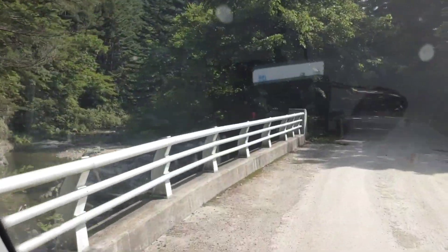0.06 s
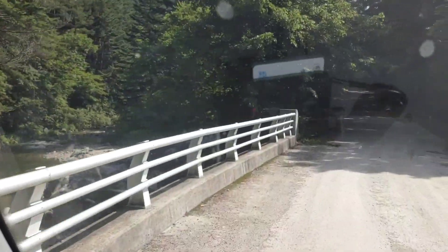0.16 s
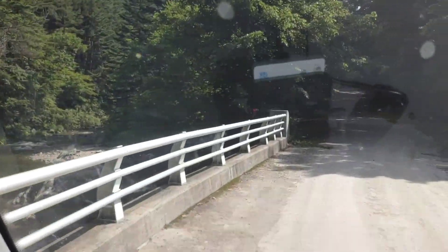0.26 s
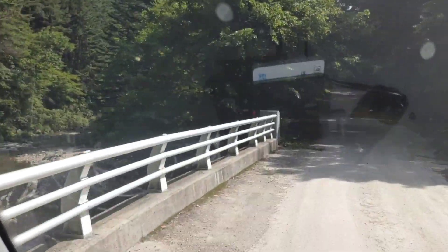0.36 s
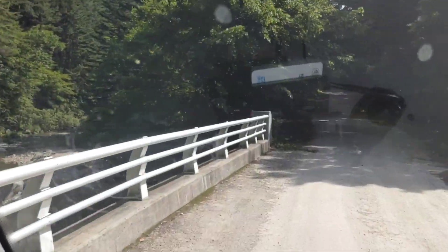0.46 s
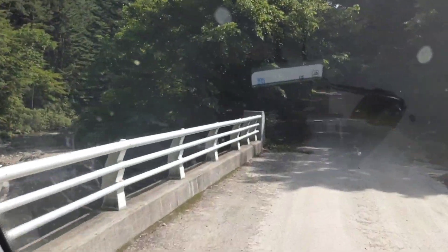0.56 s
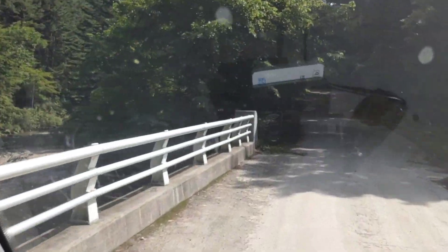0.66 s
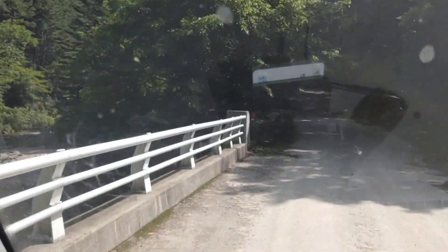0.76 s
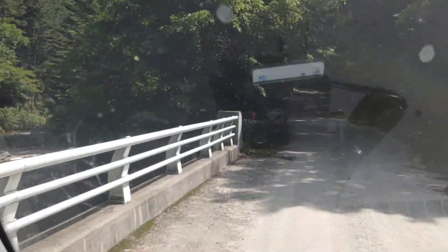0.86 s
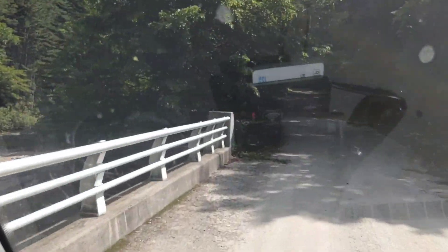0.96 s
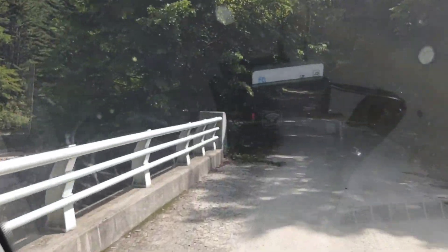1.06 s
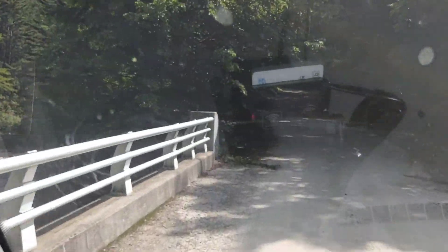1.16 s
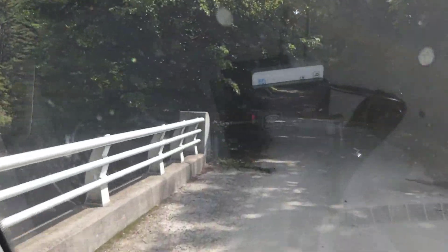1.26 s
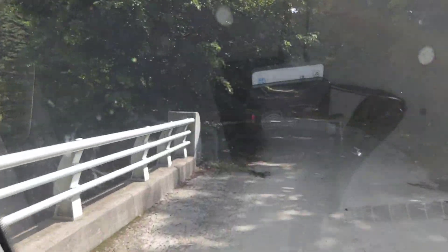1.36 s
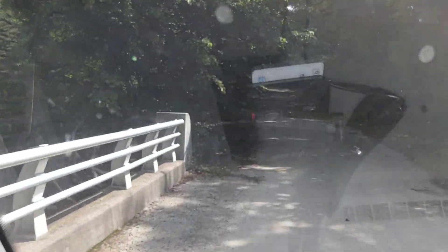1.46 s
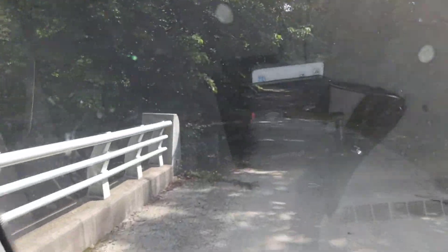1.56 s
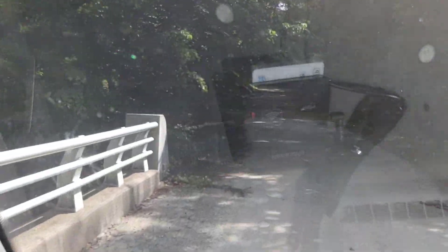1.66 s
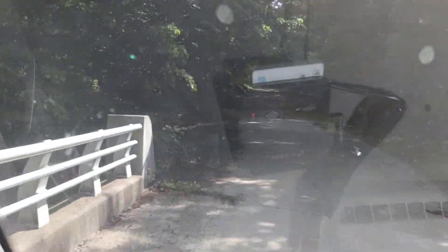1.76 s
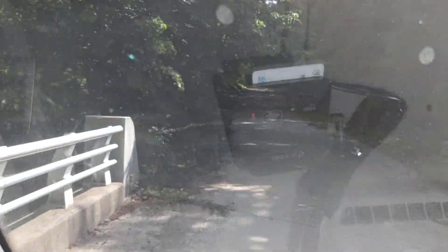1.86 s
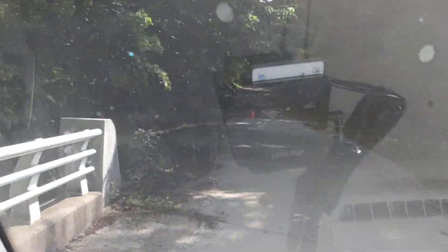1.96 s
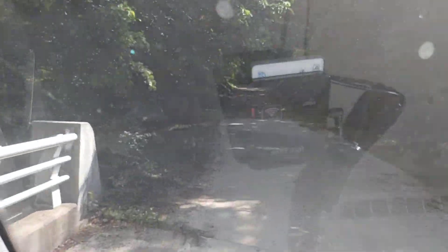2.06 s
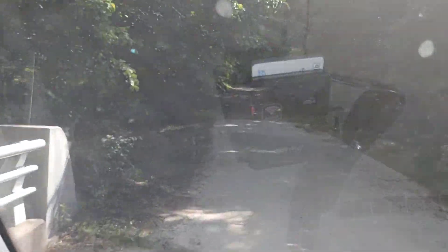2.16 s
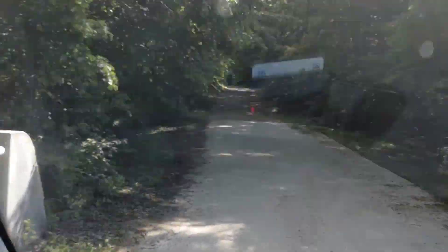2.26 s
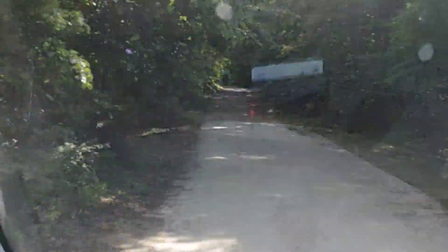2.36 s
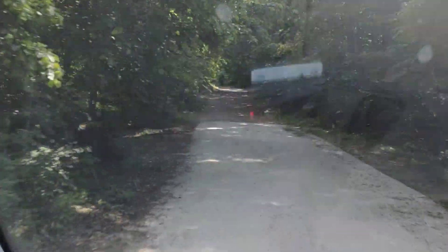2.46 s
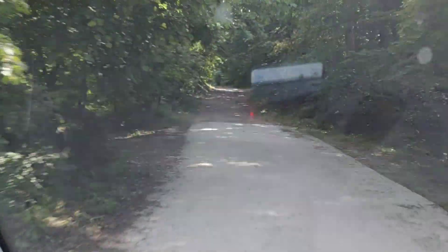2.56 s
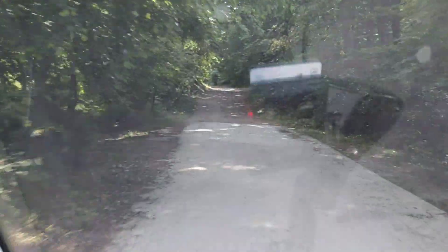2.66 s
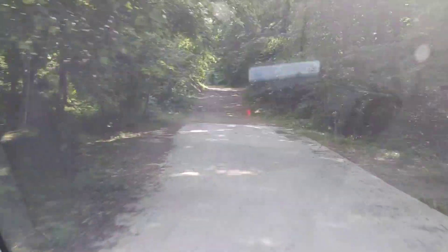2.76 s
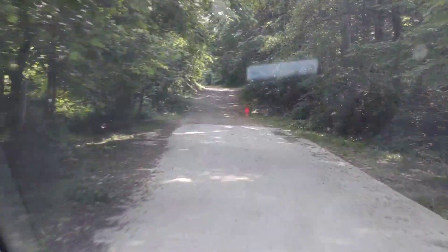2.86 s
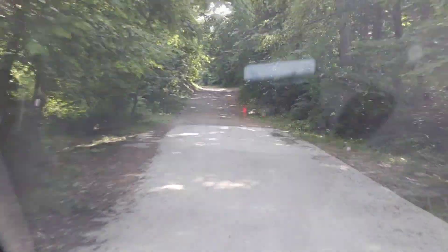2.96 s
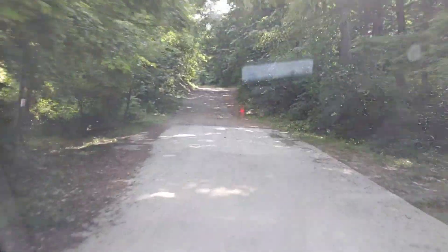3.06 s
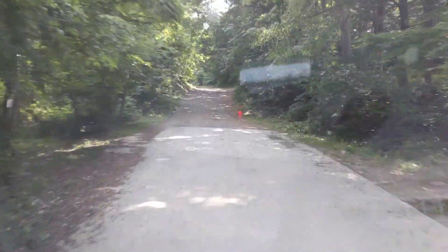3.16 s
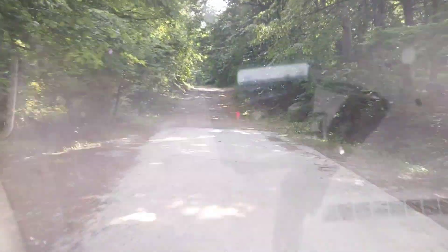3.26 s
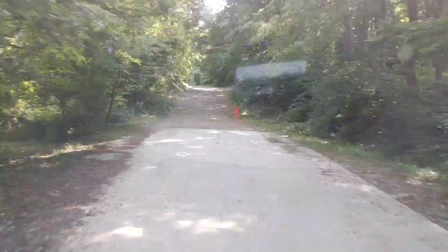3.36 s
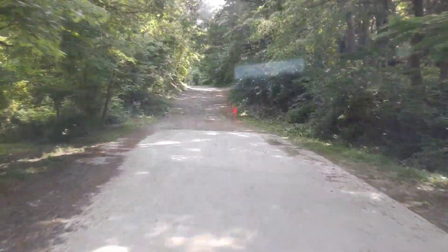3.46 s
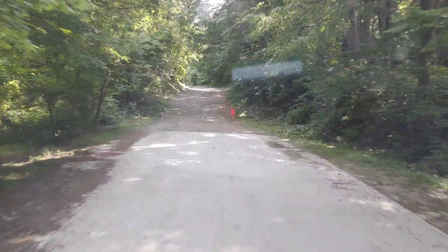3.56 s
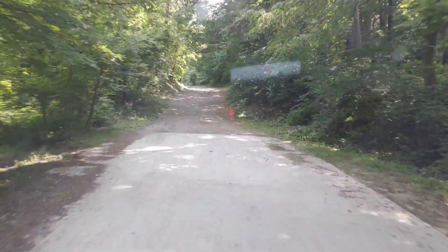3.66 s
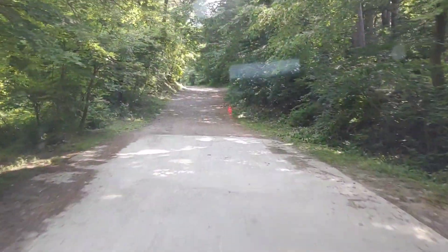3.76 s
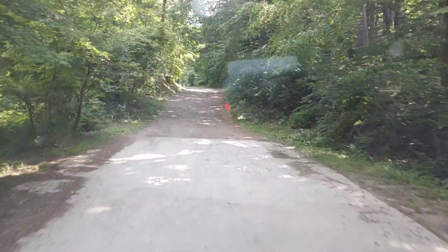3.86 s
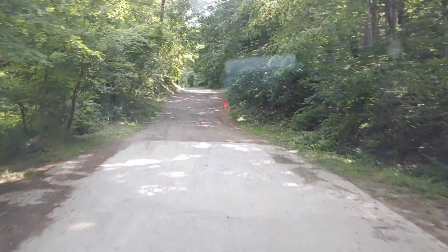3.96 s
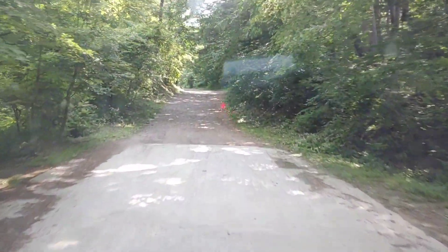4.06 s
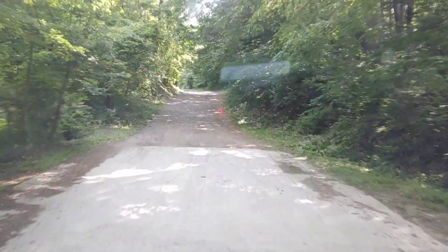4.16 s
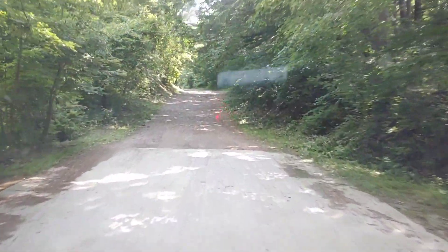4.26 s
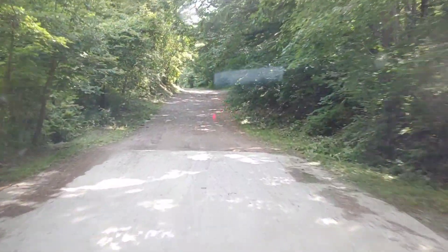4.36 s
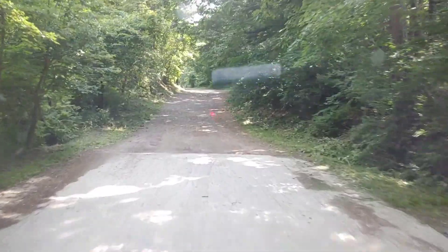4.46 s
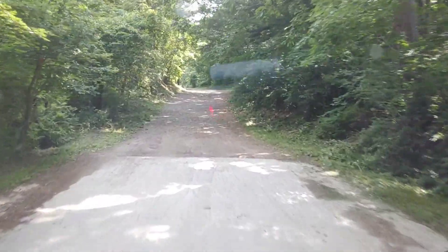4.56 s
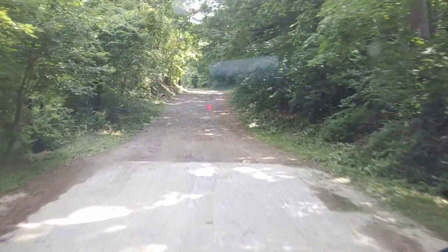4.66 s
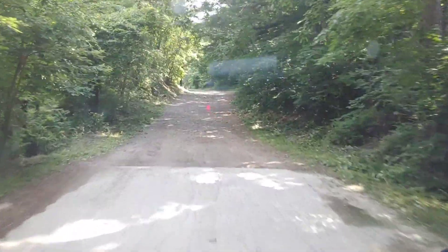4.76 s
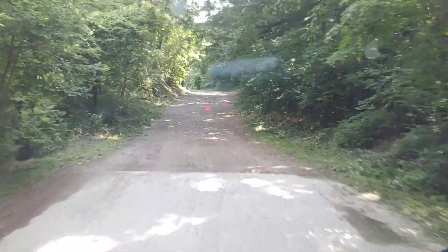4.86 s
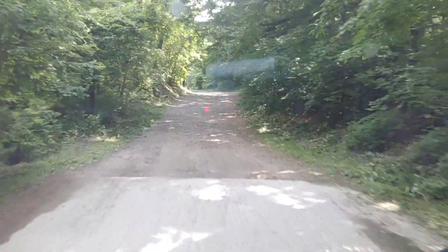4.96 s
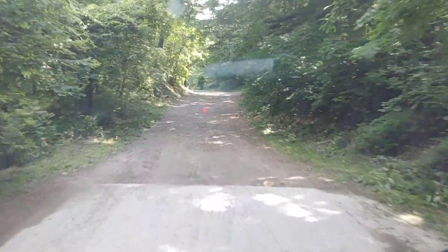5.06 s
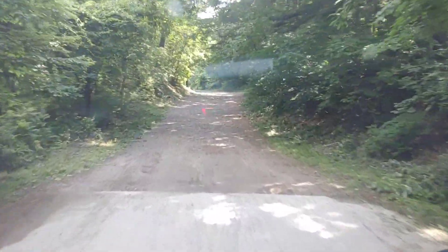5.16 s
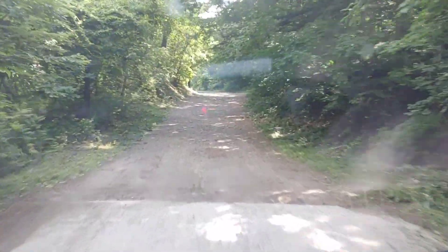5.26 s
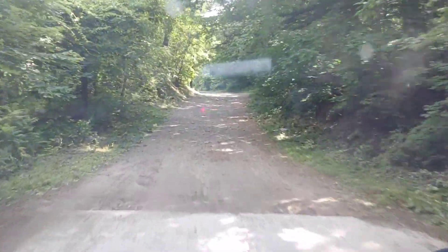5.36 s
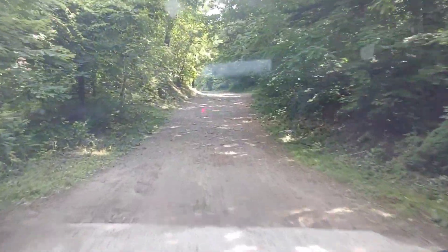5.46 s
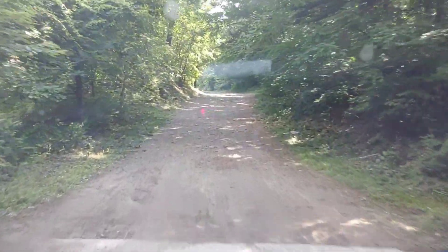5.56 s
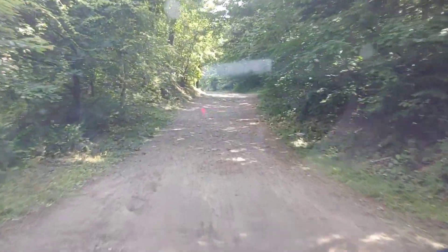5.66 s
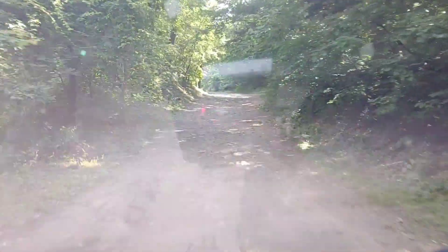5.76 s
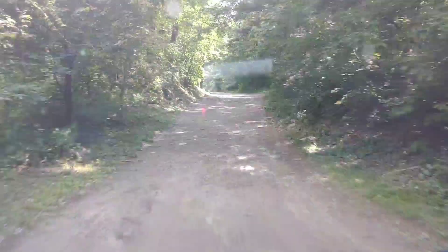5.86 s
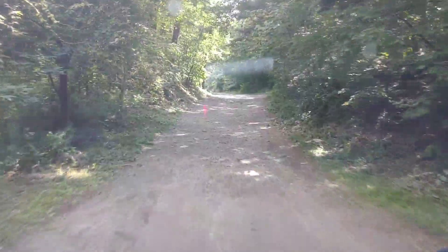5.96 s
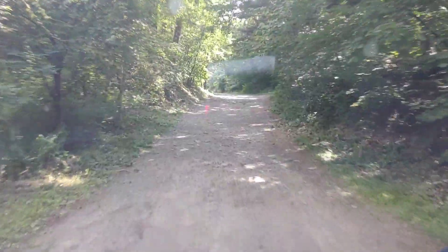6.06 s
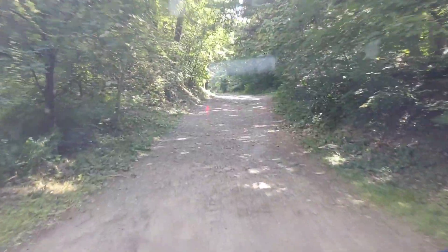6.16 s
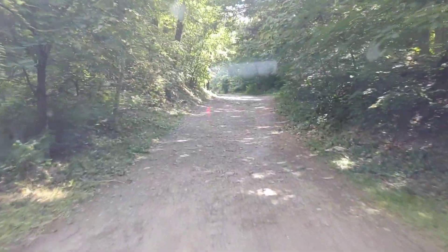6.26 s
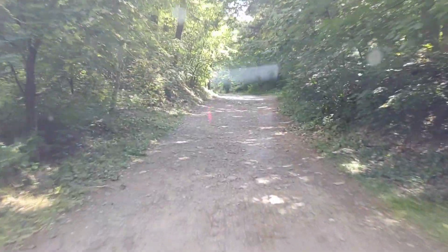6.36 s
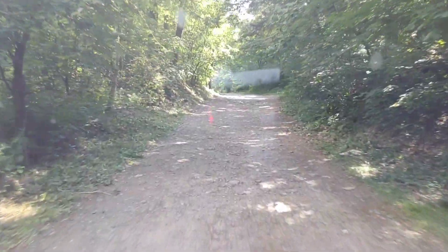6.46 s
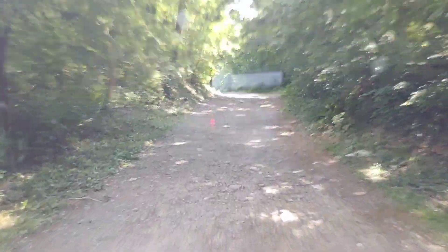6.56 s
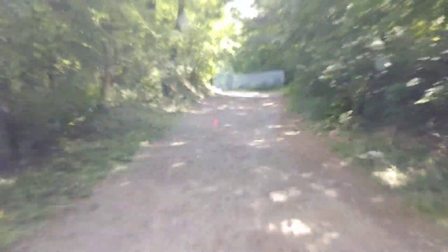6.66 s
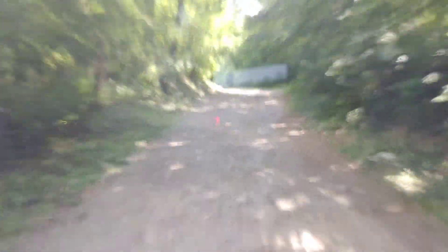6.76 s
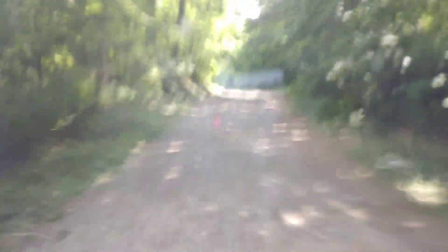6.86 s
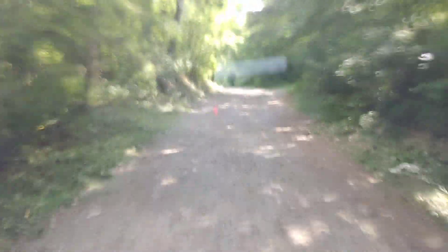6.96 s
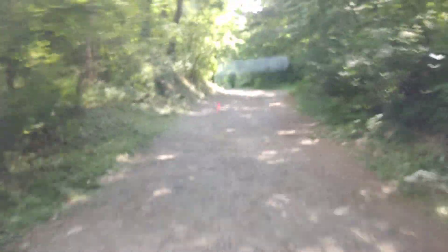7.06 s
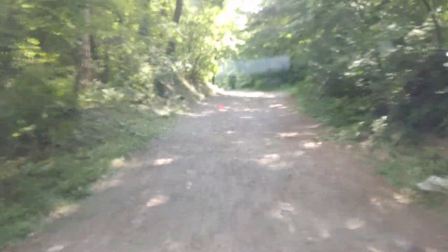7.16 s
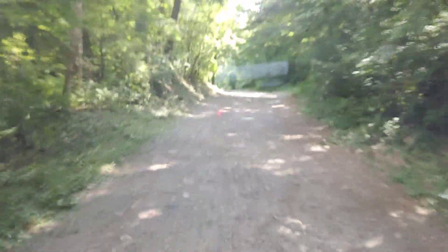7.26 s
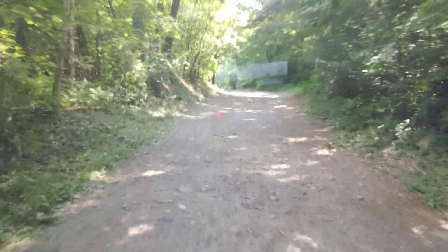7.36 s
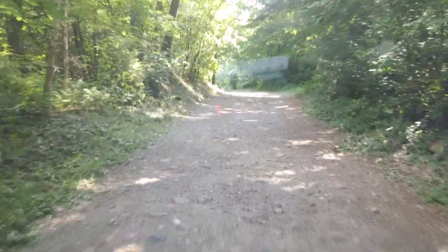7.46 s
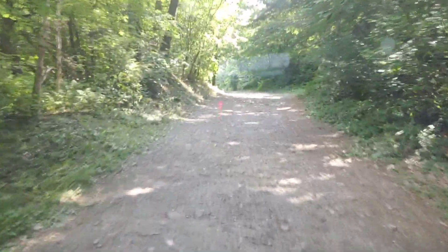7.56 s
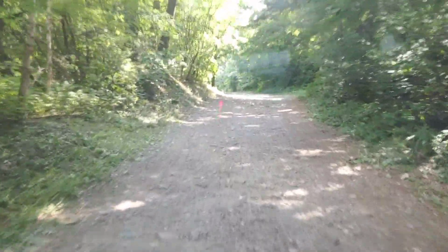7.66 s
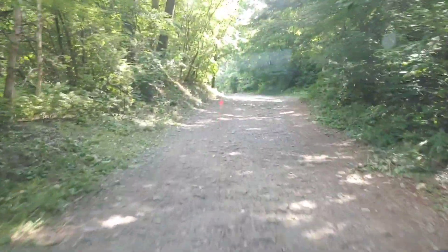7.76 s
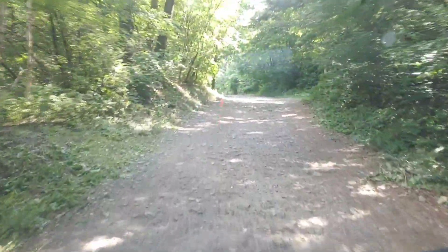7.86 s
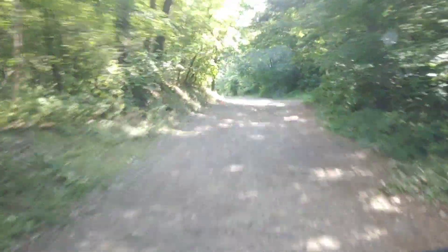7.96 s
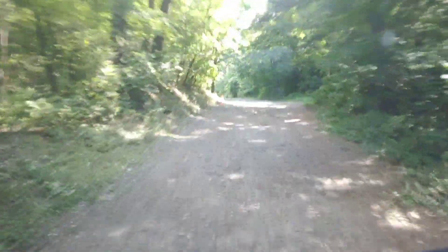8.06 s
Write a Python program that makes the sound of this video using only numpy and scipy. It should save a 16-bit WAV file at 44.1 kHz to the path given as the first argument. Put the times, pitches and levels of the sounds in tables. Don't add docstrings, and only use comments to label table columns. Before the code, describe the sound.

Car cabin rolling off a bridge: steady drone, airy road hiss and dull bumps, until stones hammer the underbody and a loose hollow part knocks.

```python
import sys
import numpy as np
from scipy import signal
from scipy.fft import rfft, irfft
from scipy.io import wavfile
from scipy.ndimage import uniform_filter1d

SR = 44100
rng = np.random.default_rng(int(sys.argv[2]) if len(sys.argv) > 2 else 0)


def transcribe(signal):
    frames = np.atleast_2d(signal).T
    limited = np.clip(frames, -1, 1)
    pcm = np.round(limited * 32767).astype(np.int16)
    wavfile.write(sys.argv[1], SR, pcm)


def to_linear_factor(level_db):
    exponent = np.asarray(level_db, float) / 20
    return 10 ** exponent


N = 358091
TIME = np.arange(N) / SR
PORT_LAG_SAMPLES = 18


def level(x, db):
    return x * to_linear_factor(db) / np.sqrt(np.mean(x ** 2))


def columns(*tables):
    s, *rest = np.transpose(np.vstack(tables))
    return [np.interp(TIME, s, c) for c in rest]


def walk(rate_hz):
    hold = int(SR / rate_hz)
    steps = np.repeat(rng.standard_normal(N // hold + 1), hold)
    return 1.23 * uniform_filter1d(uniform_filter1d(steps, hold), hold)[:N]


def grit(rate_hz, spread_db, smooth):
    where, size = rng.random(N), rng.exponential(size=N)
    sign, bed = rng.standard_normal(N), rng.standard_normal(N)
    blows = (where < rate_hz / SR) * to_linear_factor(spread_db * np.minimum(size, 2.5)) * np.sign(sign)
    return level(blows, 0) + smooth * bed


def ring(x, modes):
    out = 0
    for k, (hz, width_hz, db) in enumerate(modes):
        b, a = signal.iirpeak(hz, hz / (1.54 * width_hz), fs=SR)
        once = signal.lfilter(b, a, x, axis=-1)
        twice = signal.lfilter(b, a, once, axis=-1)
        out = out + (-1) ** k * to_linear_factor(db) * twice / np.sqrt(width_hz)
    return out


def ports(shared, own, alike_hz, treble_alike):
    hz = np.fft.rfftfreq(N, 1 / SR)
    bass = 1 / (1 + (hz / alike_hz) ** 4)
    late = np.exp(-2j * np.pi * hz * PORT_LAG_SAMPLES / SR * (1 - bass))
    alike = np.clip(0.99 * bass + treble_alike * (1 - bass), 0, 1)
    common = np.sqrt(alike) * rfft(shared)
    both = np.array([common, common * late]) + np.sqrt(1 - alike) * rfft(own, axis=-1)
    return irfft(both, N, axis=-1)


def road_noise(rate_hz, spread_db, smooth):
    shared, left, right = (grit(rate_hz, spread_db, smooth) for _ in range(3))
    return ports(shared, np.array([left, right]), alike_hz=417, treble_alike=0.2)


def colour(x, points, split_hz):
    hz = np.maximum(np.fft.rfftfreq(N, 1 / SR), 1)
    f, db = np.transpose(points)
    shaped = rfft(x, axis=-1) * to_linear_factor(np.interp(np.log(hz), np.log(f), db))
    upper = 1 / (1 + (split_hz / hz) ** 3)
    rms = np.sqrt(np.mean(irfft(shaped, N, axis=-1) ** 2))
    return irfft(shaped * (1 - upper), N, axis=-1) / rms, irfft(shaped * upper, N, axis=-1) / rms


def swell(t, db, t60_s, rise_s):
    return to_linear_factor(db - 60 * t / max(t60_s, .01)) * (1 - np.exp(-t / rise_s)) ** 2


def bursts(times_s, dbs, t60s_s, rise_s):
    out, t = np.zeros(N + SR), np.arange(SR // 3) / SR
    for s, db, t60_s in zip(times_s, dbs, t60s_s):
        i = int(s * SR)
        out[i:i + len(t)] += swell(t, db, t60_s, rise_s)
    return out[:N]


# time_s, firing_hz, load_db
ENGINE = [(0, 47.25, 3.5), (.8, 50.6, -6.5), (1.3, 52.46, 2.5), (2, 53.73, 1), (2.6, 54.6, -2.5),
          (3.1, 58.15, -2), (3.6, 59.06, 4), (4.1, 60.28, 5.5), (4.8, 58.5, -3), (5.4, 57.04, -2.5),
          (5.85, 55.7, 0), (6.6, 55.35, -2), (8.12, 55.9, -1)]
# centre_hz, width_hz, peak_db
CABIN = [(58.2, 5.8, -33), (110.2, 16, -27.5), (168.4, 13.5, -26), (210, 43, -29.5)]
# start_s, end_s, firing_multiple, level_db
WHINES = [
    (1.15, 2.15, 17.9, -51.5),
    (2.3, 3.03, 16, -47),
    (3.35, 4.3, 35, -54),
    (5.7, 6.45, 16, -46.5),
    (5.6, 6.4, 36, -56),
    (5.9, 6.45, 18, -48.5),
    (1.1, 2.4, 9.9, -46),
]


def engine():
    hz, load_db = columns(ENGINE)
    turn = 2 * np.pi * np.cumsum(hz * (1 + 0.00387 * walk(6))) / SR
    hum = 0
    for k, (centre_hz, width_hz, peak_db) in enumerate(CABIN):
        detune = 2 * ((k + 1) * hz - centre_hz) / width_hz
        db = load_db + peak_db - 10 * np.log10(1 + detune ** 4)
        hum = hum + to_linear_factor(db + 1.5 * walk(9)) * np.sin((k + 1) * turn + k)
    for start_s, end_s, multiple, db in WHINES:
        fade = np.clip(np.minimum(TIME - start_s, end_s - TIME) / 0.15, 0, 1)
        hum = hum + fade * to_linear_factor(db + 2.5 * walk(12)) * np.sin(multiple * turn + .9 * walk(15))
    return np.sqrt(2) * hum


# time_s, roughness_db
ROAD = [(0, -20.5), (.35, -21.5), (.86, -19), (1.4, -24.5), (2.55, -22), (2.97, -20.5), (3.19, -12),
        (3.37, -19.5), (3.81, -21), (5.29, -20.5), (5.98, -22), (6.33, -20.5), (6.56, -21), (6.664, -6),
        (6.88, -6.5), (7.302, -10.5), (7.696, -16), (8.12, -12.5)]
# time_s, above_usual_sway_db
HEAVES = [(.35, 10), (.62, 3.5), (1.4, 7), (1.73, 2), (2.55, 2), (2.97, 6), (3.45, 6), (3.94, 8.5),
          (4.74, 6.5), (5.29, 8), (5.56, 10.5), (6.15, -2), (6.55, 5), (6.671, 0), (7.37, 6), (8.1, 6.5)]
# centre_hz, width_hz, level_db
SWAY = [(14, 12, -18), (34, 17, -0.5), (53.6, 9.1, 2), (68, 12, 4)]
# centre_hz, width_hz, level_db
BOOM = [(103.4, 18.6, -0.5), (145, 21.3, -3.5), (175, 30, 0), (242.8, 24.7, -8.5)]
# centre_hz, width_hz, level_db
PAN = [(299.7, 63, 0), (357.6, 36.5, -6.5), (444.3, 40.5, -4), (566, 81, -6.5), (648, 90, -7)]
SMOOTH_DB, PAN_SMOOTH_DB, PAN_PER_DB, SWAY_SMOOTH_DB, SWAY_PER_DB = -20.5, -32, 1.2046, -30, 0.82
HEAVE_S = 0.1


def road():
    boom_db, = columns(ROAD)
    rougher_db = boom_db - SMOOTH_DB
    pan_db = PAN_SMOOTH_DB + PAN_PER_DB * rougher_db
    heave_db = sum(db * np.exp(-((TIME - s) / HEAVE_S) ** 2) for s, db in HEAVES)
    sway_db = SWAY_SMOOTH_DB + SWAY_PER_DB * rougher_db + heave_db
    blows = road_noise(rate_hz=220, spread_db=3.0, smooth=0.76)
    finer = road_noise(rate_hz=500, spread_db=7.0, smooth=0.88)
    slow = road_noise(rate_hz=42, spread_db=-4.0, smooth=5.2)
    sway = level(ring(slow, SWAY), -2.1) * to_linear_factor(sway_db)
    boom = level(ring(blows, BOOM), -1.64) * to_linear_factor(boom_db)
    pan = level(ring(blows + finer, PAN), -2.0) * to_linear_factor(pan_db)
    return sway + boom + pan


# time_s, level_db
AIR = [(0, -37.5), (.27, -39), (.45, -36.5), (.9, -37), (1.2, -38.5), (1.5, -39.5), (2.2, -38), (2.7, -37),
       (3.0, -39), (3.17, -35.5), (3.35, -40.5), (5.5, -41), (8.12, -39)]
# time_s, level_db
WIND = [(0, -39.5), (.25, -39.5), (.45, -36), (.75, -38.5), (1.6, -39.5), (3.2, -39.5), (3.7, -38.5),
        (4.3, -40), (6, -42), (8.12, -43)]
# freq_hz, density_db_per_hz
AIR_COLOUR = [(500, 1.5), (750, 1), (960, 3.5), (1230, 0.5), (1330, 2), (1900, -1), (2410, -7.5),
              (3370, -6), (3660, -8.5), (4860, -9.5), (6300, -15), (9500, -16), (12100, -23), (15300, -33)]
# centre_hz, width_hz, level_db
TREAD = [(1334, 44, -3), (1680, 78, -1.5), (1878, 116, 1.5), (2150, 280, -3), (2620, 320, -6.5)]
WIND_SHARE = 0.44
TREAD_DB, TREAD_S, TREAD_SPREAD_S, TREAD_DUSTY_DB = 10, 0.61, 0.9, -7


def air():
    db, = columns(AIR)
    wind_db, = columns(WIND)
    treble_db = wind_db + WIND_SHARE * (db + 41.5) - db
    tread_db = TREAD_DUSTY_DB + TREAD_DB * np.exp(-((TIME - TREAD_S) / TREAD_SPREAD_S) ** 2)
    low, high = colour(road_noise(rate_hz=5500, spread_db=6.0, smooth=4.8), AIR_COLOUR, split_hz=3300)
    tread = level(ring(road_noise(rate_hz=2700, spread_db=5.0, smooth=2.9), TREAD), -7.5)
    tread = tread * to_linear_factor(tread_db + 3.0 * walk(14))
    low = low * to_linear_factor(1.0 * walk(6.7))
    high = high * to_linear_factor(treble_db + 1.02 * walk(11))
    return to_linear_factor(db + 5.0 + 0.19 * walk(1.27)) * (low + high + tread)


# time_s, peak_db, boom_hz, hardness_db
SEAMS = [(0.068, -10, 186, -8.5), (0.192, -5, 180, -14), (0.303, -7, 145, -11), (0.38, 0.5, 145, -15.5),
         (0.645, 0, 154, -14), (0.699, -11, 250, -7), (0.795, -4, 138, -12.5), (0.849, -7.5, 158, -20),
         (0.916, -3, 155, -14.5), (0.931, 0, 182, -22), (1.113, -4, 133.6, -24), (1.137, -22, 115, -12),
         (1.862, -18, 145, -6.5), (2.303, -11.5, 153, -10), (2.534, -7, 151, -15), (2.62, -15, 163, -7),
         (2.7, -3.5, 167, -13), (2.965, -3, 157, -16),
         (3.086, -1.5, 134, -7.5), (3.124, -7, 170, -3), (3.16, -12, 117, -5), (3.212, -13, 131, -23),
         (3.262, -22, 149, 2), (3.324, -7.5, 181.7, -9), (3.364, -15.5, 125, -7), (3.572, -3, 119, -17.5),
         (3.771, -3.5, 140, -12.5), (3.839, -9, 146, -10), (3.93, -9.5, 134, -7), (4.097, -5, 162, -21),
         (4.199, -0.5, 179, -17), (4.219, -4, 157, -20), (4.439, -12, 109, -29), (4.515, -4.5, 170, -5),
         (4.531, 0.5, 167.2, -22), (4.559, -10.5, 106, -32), (4.807, -3.5, 145, -11.5),
         (4.895, -5, 129.5, -8.5), (5.142, -13, 116, -12), (5.387, -5, 139.3, -20), (5.459, -2.5, 175, -23),
         (5.541, -1, 200, -20), (5.59, -10, 111.6, -11), (5.652, 1.5, 167.1, -12.5), (5.93, -12, 120, -30),
         (6.057, -3, 158.6, -14), (6.297, -5.5, 161, -25), (6.451, -1.5, 160, -20)]
# time_s, peak_db, boom_hz, hardness_db
STONES = [(6.595, -3, 167.3, -5.5), (6.668, -8, 154, 1), (6.797, 4, 154, -27), (6.951, 8, 168.3, -21),
          (7.059, 6.5, 158.6, -19), (7.141, 4, 148, -15), (7.221, 3, 162, -16), (7.31, 4.5, 144.3, -27),
          (7.35, 2, 233, -2.5), (7.415, 6.5, 163.6, -20), (7.45, -10, 174, -22), (7.535, -1, 184, -1),
          (7.578, 3.5, 146.4, -9.5), (7.632, -8.5, 145, -12), (7.701, -10, 160.4, -12),
          (7.796, -8, 175, -5), (7.837, -10.5, 103, 0), (7.95, -12, 145, -12), (8.003, -1, 145, -5.5),
          (8.054, -0.5, 168, -6), (8.082, 1.5, 143, -3)]
# freq_hz, density_db_per_hz
SHAKE_COLOUR = [(450, 1.5), (700, -1), (895, -3), (1130, -3.5), (1410, -7), (2050, -13.5), (3570, -16.5),
                (4280, -16), (6300, -17.5), (7800, -17.5), (10200, -19.5), (12100, -26.5), (15300, -32)]
THUMP_CYCLES = 14.3
BUZZ_DB, BUZZ_PER_HARD_DB, BUZZ_PER_PEAK_DB = -25.5, 0.6336, 0.3


def thumps():
    s, db, hz, hard_db = np.transpose(SEAMS + STONES)
    t60_s = THUMP_CYCLES / hz
    buzz_db = BUZZ_DB + BUZZ_PER_HARD_DB * (hard_db + 16.5) + (BUZZ_PER_PEAK_DB - 1) * db
    s = s - .006
    boom, t = np.zeros(N + SR), np.arange(SR // 3) / SR
    for k in range(len(s)):
        tone = np.sin(2 * np.pi * hz[k] * t) + 0.42 * np.sin(2 * np.pi * 1.334 * hz[k] * t)
        i = int(s[k] * SR)
        boom[i:i + len(t)] += tone * swell(t, db[k] + 6.0, t60_s[k], rise_s=0.0087)
    pan_gain = bursts(s, db + hard_db + 33.5, 1.1 * t60_s, rise_s=0.0023)
    pan = ring(road_noise(rate_hz=1000, spread_db=8.0, smooth=0.95) * pan_gain, PAN[:4])
    trim = road_noise(rate_hz=2900, spread_db=4.0, smooth=0.43)
    buzz = colour(trim, SHAKE_COLOUR, split_hz=2000)[0]
    buzz = to_linear_factor(3.5) * buzz * bursts(s, db + buzz_db, 0.82 * t60_s, rise_s=0.0036)
    return boom[:N] + pan + buzz


# time_s, peak_db, pitch_hz
DRUMS = [(0.074, -23, 299), (0.183, -15.5, 460), (0.301, -27, 347), (0.376, -13.5, 267), (0.642, -23, 345),
         (0.707, -13, 445), (0.798, -11.5, 310), (0.911, -15, 282), (1.121, -16, 282), (1.204, -19, 274),
         (1.863, -17, 315), (1.959, -24, 315), (2.541, -23, 302), (2.563, -22, 323), (2.679, -29, 345),
         (2.698, -20, 331), (2.876, -17, 280), (2.976, -19, 275), (3.077, -10, 304), (3.131, -5.5, 295),
         (3.213, -22, 363), (3.231, -19, 304), (3.263, -24, 345), (3.286, -14, 302), (3.314, -22, 274),
         (3.356, -15.5, 330), (3.467, -21, 310), (3.567, -17, 550), (3.636, -19, 270), (3.77, -13.5, 460),
         (3.832, -23, 275), (3.932, -18, 452), (4.093, -18, 288), (4.193, -18, 350), (4.464, -33, 272),
         (4.514, -10, 462), (4.621, -20, 272), (4.804, -16.5, 277), (4.896, -17, 460), (5.088, -28, 281.3),
         (5.17, -14, 343), (5.384, -22, 272), (5.462, -17, 450), (5.544, -7, 322), (5.609, -22, 342),
         (5.654, -19, 348), (6.059, -23, 300), (6.092, -21, 283), (6.297, -19, 350), (6.501, -18, 276.2)]
# time_s, peak_db, pitch_hz
GRAVEL_DRUMS = [(6.576, -30, 320), (6.587, -13.5, 271.3), (6.598, -17, 272), (6.621, -7.5, 310),
                (6.664, -10, 299), (6.734, -5, 286), (6.803, -17, 299), (6.813, -10, 286),
                (6.875, -11, 303.6), (6.909, -12, 293), (6.939, -2, 307), (6.998, -10, 360),
                (7.053, -11, 358), (7.138, -12, 351), (7.181, -13, 350), (7.193, -9, 331),
                (7.223, -11, 301), (7.263, -20, 353), (7.31, -18, 552), (7.31, -5, 301), (7.349, -19, 301),
                (7.392, -8, 292), (7.407, -18, 272), (7.416, -6, 307), (7.446, -14, 277), (7.535, -17, 269),
                (7.535, -2.5, 297), (7.629, -7.5, 307), (7.707, -24, 269), (7.706, -21, 288),
                (7.738, -20, 310), (7.795, -15, 342), (7.835, -9, 355), (7.893, -11, 344), (7.951, -9, 304),
                (8.007, -7.5, 299), (8.054, -6, 305), (8.085, -10, 360)]
DRUM_DB, DRUM_CYCLES, DRUM_RISE_S = 6, 14.4, .003


def drums():
    out, t = np.zeros((2, N + SR)), np.arange(SR // 6) / SR
    for s, db, hz in DRUMS + GRAVEL_DRUMS:
        tone = np.sin(2 * np.pi * hz * t) * swell(t, db + DRUM_DB, DRUM_CYCLES / hz, DRUM_RISE_S)
        for side in range(2):
            i = int((s - .003) * SR) + side * PORT_LAG_SAMPLES
            out[side, i:i + len(t)] += tone
    return out[:, :N]


# time_s, level_db
SHAKE = [
    [(2.95, -50), (2.964, -37), (3.154, -41), (3.39, -47)],
    [(6.55, -44.5), (6.654, -26), (6.8, -23), (6.978, -30.5), (7.344, -30.5), (7.654, -48), (7.86, -36.5),
     (7.972, -37.5), (8.12, -28)],
]
# centre_hz, width_hz, level_db
TRIM = [(1100, 99, -1.5), (1567, 61, -2), (1987, 140, -5.5), (2305, 150, -9), (2670, 160, -8),
        (3120, 900, -5), (4160, 410, -7)]
# time_s, peak_db
TICKS = [
    (6.5964, -39),
    (6.664, -23),
    (6.9697, -30),
    (6.992, -36),
    (7.0349, -32),
    (7.1048, -31),
    (7.1614, -40),
    (7.2791, -33),
]
TICK_DB, TICK_T60_S = 19, .018
GRIT_DB, GRIT_FRESH_DB, GRIT_PEAK_S, GRIT_SPREAD_S = -16, 5, 6.78, 0.096


def shake():
    joint, gravel = SHAKE
    db, = columns([(2.9, -90)], joint, [(2.5, -90)], [(6.54, -90)], gravel)
    bright_db = GRIT_DB + GRIT_FRESH_DB * np.exp(-((TIME - GRIT_PEAK_S) / GRIT_SPREAD_S) ** 2)
    low, high = colour(road_noise(rate_hz=1200, spread_db=3.5, smooth=0.46), SHAKE_COLOUR, split_hz=3200)
    ticks = road_noise(rate_hz=700, spread_db=9.5, smooth=0.33)
    panels = sum(ring(ticks, [mode]) * to_linear_factor(3.5 * walk(60)) for mode in TRIM)
    low = low * to_linear_factor(1.7 * walk(40) + 2.0) + level(panels, -4.0)
    high = high * to_linear_factor(2.0 * walk(30))
    steady = to_linear_factor(db + 0.8) * (low + high * to_linear_factor(bright_db + 12.0))
    tick_s, tick_db = np.transpose(TICKS)
    t60_s = np.full(len(tick_s), TICK_T60_S)
    pings = high * bursts(tick_s - .001, tick_db + TICK_DB, t60_s, rise_s=0.0014)
    return steady + pings


# time_s, peak_db, rattle_db, brightness_db
VOLLEYS = [(6.595, -15, -16, -16), (6.624, -16, -11, -17), (6.645, -13, -16, -21), (6.667, -25, -6, -10),
           (6.706, -6, -13, -14), (6.726, -8.5, -11, -10), (6.744, -15, -24, -25), (6.774, -17, -2, -12),
           (6.793, -12, -11, -18), (6.817, -22, -9, -16), (6.833, -16.5, 0.5, -11), (6.844, -19, -1, -1),
           (6.87, -8, -24, -14), (6.899, -16, -5, -13), (6.933, -12, -19, -20), (6.947, -17, -13, -15),
           (6.978, -16, -11, -18), (7.013, -15.5, -13, -21), (7.025, -20, -18, -21), (7.036, -14, -13, -17),
           (7.057, -12, -15, -23), (7.092, -29, -21, -19), (7.104, -16, -18, -15), (7.119, -21, -14, -14),
           (7.141, -13, -14, -16), (7.179, -12.5, -11, -19), (7.195, -17, -9, -12), (7.221, -17, -13, -15),
           (7.239, -26, -13, -15), (7.276, -16.5, -10, -16), (7.29, -17, -6, -14), (7.307, -14, -15, -18),
           (7.347, -17, -8, -20), (7.369, -29, -11, -16), (7.406, -17.5, -3, -15), (7.45, -17, -9, -30),
           (7.477, -30, -12, -17), (7.533, -19, -4.5, -17), (7.549, -35, -15, -19), (7.581, -18, -6, -26),
           (7.597, -34, -15, -20), (7.632, -19, -12, -21), (7.701, -22, -20, -16), (7.74, -15.5, -16, -20),
           (7.837, -19, -11, -19), (7.897, -22, -13, -17), (8.005, -18.5, -16, -21), (8.052, -13, -12, -21),
           (8.069, -16, -14, -19), (8.087, -14, -9.5, -20)]
# time_s, peak_db, rattle_db, brightness_db
STRAYS = [(3.08, -20.5, -11, -19), (3.099, -30, -2, -11), (3.127, -20.5, -3.5, -16),
          (3.158, -15.5, -15, -18), (3.184, -30, -10, -15), (3.224, -26, -4, -15), (3.263, -25, -14, -21),
          (3.294, -19.5, -15, -19), (3.324, -26, -14, -18), (3.359, -36, -13, -14), (3.77, -23, -17, -16),
          (4.196, -20.5, -11, -18), (4.211, -24, -12, -16), (4.512, -22.5, -8, -22), (4.525, -25, -7, -19),
          (4.804, -29, -8, -16), (4.899, -28, -10, -17), (5.394, -29, -19, -17), (5.455, -26, -12, -15),
          (5.544, -31, -4, -14), (5.645, -18, -22, -24), (5.661, -28, -14, -18), (6.45, -29, -6, -17),
          (6.502, -21, -16, -18)]
# centre_hz, width_hz, level_db
RATTLE = [(2000, 500, -0.5), (2690, 510, 1.5), (3440, 1300, -5)]
VOLLEY_T60_S = 0.057


def volleys():
    s, db, rattle_db, bright_db = np.transpose(VOLLEYS + STRAYS)
    rest, high = colour(road_noise(rate_hz=2500, spread_db=3.0, smooth=0.98), SHAKE_COLOUR, split_hz=4800)
    low, mid = colour(rest, [(300, -5), (600, -2), (8000, -1)], split_hz=2800)
    t60_s = np.full(len(s), VOLLEY_T60_S)
    dull = level(low, 3.27) * bursts(s - .002, db, t60_s, rise_s=0.0026)
    rattle_gain = bursts(s - .001, db + rattle_db, 1.12 * t60_s, rise_s=0.0044)
    rattle = level(ring(mid, RATTLE), 3.7) * rattle_gain
    hiss = level(high, 3.5) * bursts(s - .003, db + bright_db, 1.03 * t60_s, rise_s=0.0045)
    return dull + rattle + hiss


# time_s, peak_db, pitch_hz, left_minus_right_db
KNOCKS = [
    (6.707, 2, 1054, -4),
    (6.9958, -6.5, 1090, -6.5),
    (7.0924, -18, 1120, 0),
    (7.7392, -12, 1070, 0.5),
    (7.7588, -23, 1100, 1),
    (7.7912, -23, 1055, 0.5),
    (7.8392, -24, 1060, -7),
    (8.0242, -7, 1100, -2.5),
    (8.044, -9, 1050, -7),
]


def knocks():
    out, t = np.zeros((2, N + SR)), np.arange(SR // 8) / SR
    for s, db, hz, balance_db in KNOCKS:
        phase = 2 * np.pi * hz * (t + 0.00026 * (1 - np.exp(-t / 0.00067)))
        contact = .5 * np.exp(-t / 0.0013) * np.sin(2.9 * phase)
        tone = np.sin(phase) + 0.2 * np.sin(1.14 * phase) + contact
        tone = tone * to_linear_factor(db - 60 * t / 0.026) * (1 - np.exp(-t / 0.00025))
        for side in range(2):
            i = int(s * SR) + side * (PORT_LAG_SAMPLES // 3)
            out[side, i:i + len(t)] += tone * to_linear_factor(balance_db * (1.5 - side))
    return out[:, :N]


def scene():
    return engine() + road() + air() + thumps() + drums() + shake() + volleys() + knocks()


def band_limit(x):
    return signal.sosfilt(signal.butter(12, 15700, fs=SR, output="sos"), x)


# freq_hz, left_minus_right_db
PORT_BALANCE = [(60, 1.5), (150, 0.3), (330, 2.5), (650, -3), (1400, 1), (2800, 1), (5500, 3),
                (10000, -1.6), (15000, 2)]
# centre_hz, width_hz, share_removed
MIC_DIP = (7060, 840, 0.37)
TOP_HZ, OFFSET, HARDNESS = 15200, -.0036, 5


def record(dry):
    hz = np.fft.rfftfreq(N, 1 / SR)
    f, db = np.transpose(PORT_BALANCE)
    tilt_db = np.interp(np.log(hz + 1), np.log(f), db) / 2
    dip_hz, width_hz, share = MIC_DIP
    housing = 1 - share * np.exp(-(2 * (hz - dip_hz) / width_hz) ** 2)
    housing = housing * to_linear_factor(-34 * (hz > TOP_HZ))
    heard = irfft(rfft(dry, axis=-1) * housing * to_linear_factor(np.array([tilt_db, -tilt_db])), N, axis=-1)
    rounded = heard / (1 + np.abs(heard) ** HARDNESS) ** (1 / HARDNESS)
    return band_limit(OFFSET + rounded)


dry = scene()
out = record(dry)
transcribe(out)
```